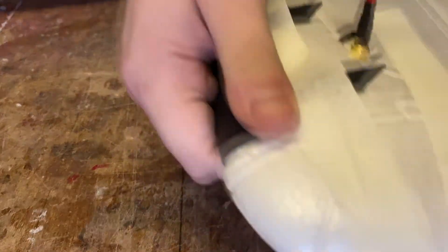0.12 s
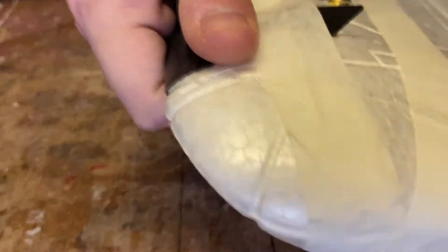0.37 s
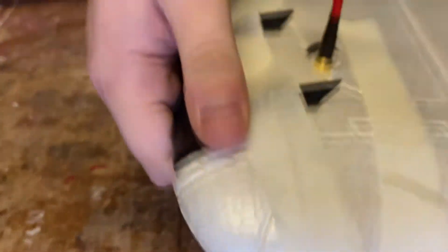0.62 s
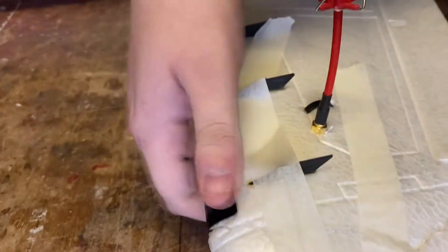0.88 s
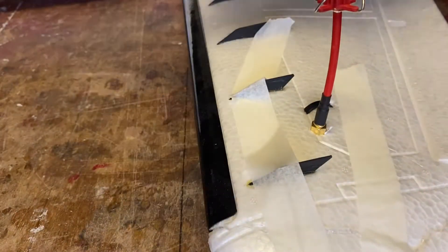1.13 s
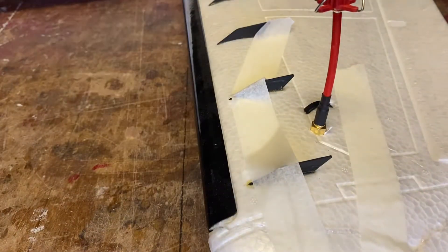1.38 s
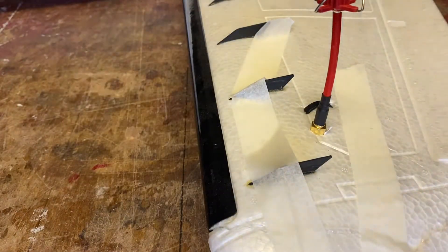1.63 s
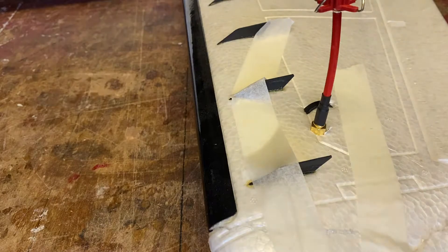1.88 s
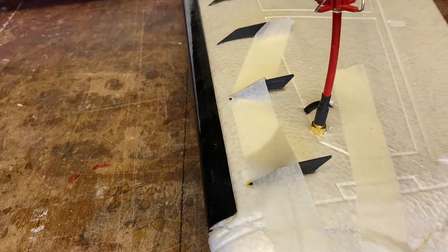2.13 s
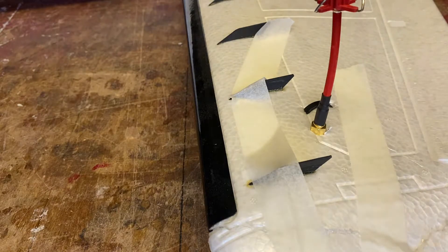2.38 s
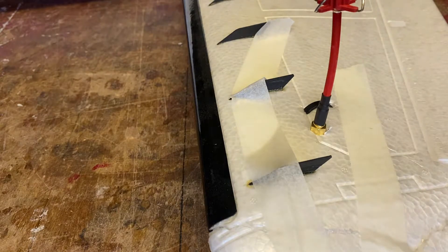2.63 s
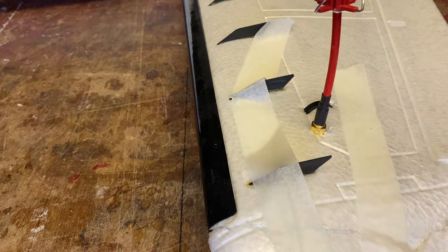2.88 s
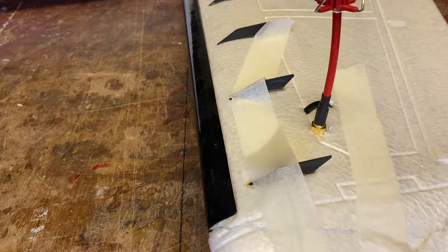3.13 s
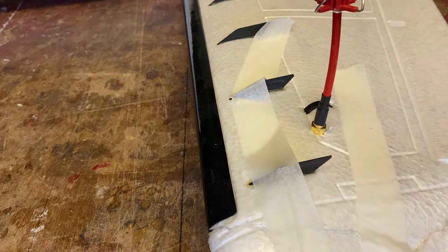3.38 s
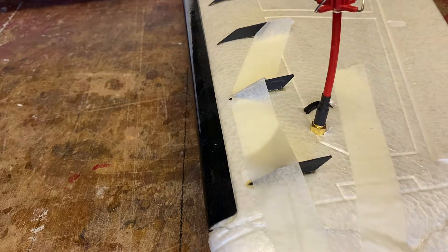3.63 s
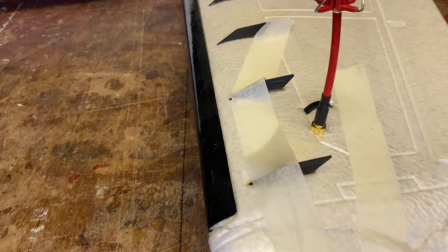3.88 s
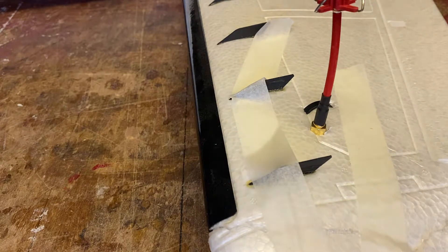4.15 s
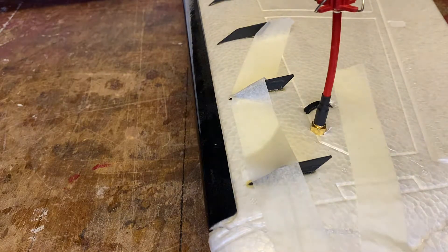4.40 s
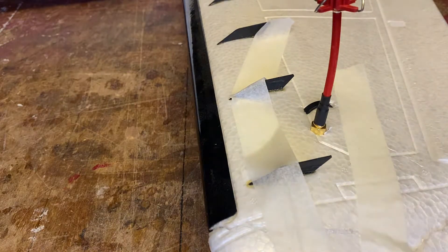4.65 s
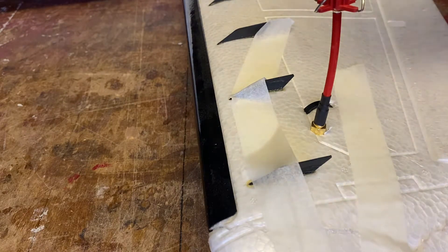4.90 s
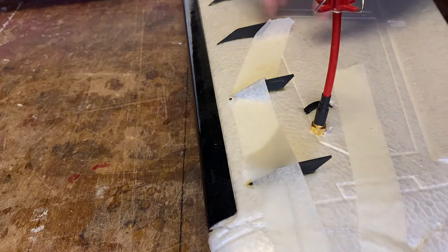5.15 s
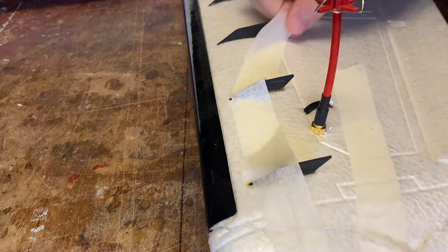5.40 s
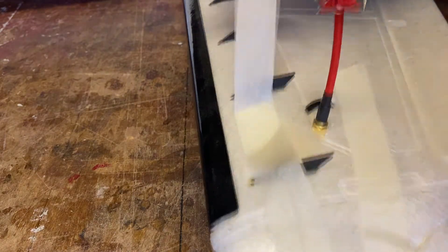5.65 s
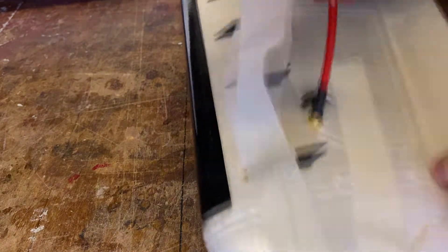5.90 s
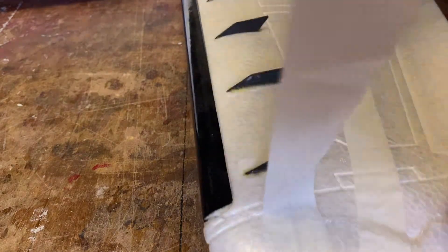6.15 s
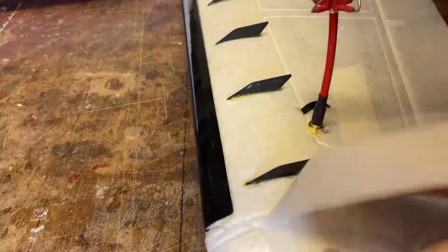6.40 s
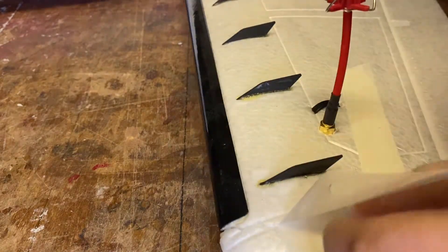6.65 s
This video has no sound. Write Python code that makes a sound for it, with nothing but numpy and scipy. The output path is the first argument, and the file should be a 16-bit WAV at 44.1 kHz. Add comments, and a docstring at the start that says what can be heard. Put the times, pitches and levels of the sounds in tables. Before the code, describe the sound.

Tape rips off a foam model wing: opening snaps and knocks, crisp crumpling of a loose strip, near silence, then sharp fast rips and bench knocks.

```python
"""A small quiet workshop: tape is peeled off a foam model wing in short rips, close to two microphone ports.
The peel is made of short noise bursts when slow and dense crackle when fast, with short ticks around it.
The wing slides on the bench as resonant noise and knocks as falling tones; low rumble thuds and once rises.
Between the peels a loose strip of tape crumples off to the right, as coloured bursts, rustle and low body.
A short room answer, a low hum and a faint hiss lie behind."""
import sys
import numpy as np
from scipy import signal
from scipy.fft import rfft, irfft, next_fast_len
from scipy.io import wavfile

SR = 44100
rng = np.random.default_rng(int(sys.argv[2]) if len(sys.argv) > 2 else 0)


def convert_level_to_amplitude(level_db):
    """Map a level in decibels to its linear amplitude factor."""
    exponent = np.asarray(level_db, float) / 20
    return 10 ** exponent


def waveform_to_disk(signal):
    """Save audio, clipped to [-1, 1], as 16-bit WAV at the path in sys.argv[1]."""
    frames = np.transpose(np.atleast_2d(signal))
    scaled = np.clip(frames, -1, 1) * 32767
    samples = np.round(scaled).astype(np.int16)
    wavfile.write(sys.argv[1], SR, samples)


N = 298557  # samples


# Fast rips of the tape. Each row: start in seconds, end in seconds, level in dB.
FAST_RIPS = [(5.721, 5.779, -22), (5.841, 5.882, -18.5)]
# Slow pulls on the tape. Each row: start in seconds, hold in seconds, level in dB.
SLOW_TUGS = [(0, .11, -30.5), (.645, 0.038, -37), (.8, .09, -36), (5.335, 0.075, -35), (5.43, 0.025, -33.5),
             (5.465, 0.045, -31), (5.512, 0.023, -22.5), (5.557, 0.03, -21.5), (5.605, 0.015, -27),
             (5.637, 0.0045, -27), (5.66, .05, -47.5), (5.778, .03, -37.5)]
# Tone colour of the peeling and of the short ticks. Each row: frequency in Hz, level in dB.
PEEL_COLOUR = [(150, -7.5), (500, 4.5), (2200, 6.5), (3700, 4), (6000, 4.5), (10000, 5.5), (15600, 0),
               (16500, -14.5)]


def peeling():
    """Glue threads break one by one when pulled slowly and merge into a rip when pulled fast."""
    tug = swells(SLOW_TUGS, rise=1999.5, fall=902.5)
    threads = scatter(tug, rate=400, spread_db=3.5, centre_hz=5500, octaves=2.5)
    slow = [snaps(threads, PEEL_COLOUR, rise=0.000093, life=0.00077, octaves=2.9, gain_db=2.5)
            for _ in range(2)]
    crackling = crackle(rate=5200, spread_db=0.0, life=0.00041, smooth=0.33)
    fast = unit(coloured(pair(crackling, alike=0.61), PEEL_COLOUR))
    t = np.arange(N) / SR
    pull = np.zeros(N)
    for start, end, db in FAST_RIPS:
        fade_in = np.clip((t - start) / 0.0077, 0, 1)
        fade_out = np.clip((end - t) / 0.0038, 0, 1)
        pull += convert_level_to_amplitude(db) * fade_in * fade_out
    slow_peel = tug * (pair(slow, alike=0.2) + convert_level_to_amplitude(-9) * fast)
    return slow_peel + pull * fast


# Short ticks: glue snaps during the peels, small ticks and taps of handling between them.
# Each row: time in seconds, relative level in dB, centre pitch in Hz.
SHORT_TICKS = [(0.0154, -10, 13820), (0.0273, -15, 14980), (0.0483, -2.5, 2120), (0.0907, -19, 2970),
               (0.1027, -3.5, 9530), (0.1164, -12.5, 2000), (0.4065, -20.5, 2670), (0.6311, -28, 5875),
               (0.6486, -23, 3360), (0.6711, -22.5, 4674), (0.7986, -20, 4047), (0.8064, -20.5, 3620),
               (0.8659, -16, 6860), (0.8844, -19, 3264), (1.1054, -35, 5964), (4.0243, -35.5, 4800),
               (4.0721, -30.5, 5595), (5.3063, -20.5, 2605), (5.3348, -21, 10020), (5.3438, -19, 10710),
               (5.3657, -18, 9840), (5.3702, -16.5, 11300), (5.376, -16, 9990), (5.4341, -13, 2540),
               (5.4515, -13, 15090), (5.5101, -9, 2090), (5.5443, -12.5, 10130), (5.5578, -11, 9730),
               (5.5874, -6.5, 9250), (5.6234, -12.5, 2427), (5.6361, -10.5, 9300), (5.7256, -17.5, 2440),
               (5.8386, -5.5, 10420), (6.2053, -27, 1830), (6.4029, -33.5, 2277), (6.4967, -37.5, 952),
               (6.5141, -31.5, 1149), (6.7251, -28.5, 1124)]


def ticks():
    """Each glue snap or small tap is a short noise burst leaning to its own pitch."""
    sides = [snaps(SHORT_TICKS, PEEL_COLOUR, rise=0.0003, life=0.0026, octaves=0.45, gain_db=-1.0)
             for _ in range(2)]
    return pair(sides, alike=0.43)


# The loose strip buckles. Each row: time in seconds, relative level in dB, centre pitch in Hz.
STRIP_CREASES = [(1.3592, -24, 1974), (1.4589, -29, 2953), (1.5178, -21, 4790), (1.638, -19.5, 2000),
                 (1.6634, -24.5, 2858), (1.6733, -15.5, 2758), (1.7386, -20, 2580), (1.823, -20, 5700),
                 (1.8432, -13.5, 5500), (1.9021, -24.5, 5380), (1.9985, -12, 5223), (2.009, -5, 2632),
                 (2.0842, -6.5, 4435), (2.1829, -24.5, 5780), (2.2505, -21.5, 5600), (2.2979, -24, 2980),
                 (2.3068, -20, 4500), (2.358, -23.5, 5914), (2.3787, -15.5, 5500), (2.4441, -24, 2700),
                 (2.5477, -9.5, 5240), (2.6291, -17.5, 3546), (2.6501, -21.5, 5660), (2.6892, -20, 5220),
                 (2.721, -17, 4620), (2.733, -16, 4660), (2.8646, -18, 3760), (2.8768, -28.5, 3240),
                 (2.9764, -23, 2594), (3.0094, -28, 5980), (3.027, -21, 2530), (3.1995, -28, 5800),
                 (3.227, -18.5, 2830), (3.2455, -24.5, 5310), (3.2564, -23, 3250), (3.339, -26, 6100),
                 (3.46, -31, 4330), (3.545, -32.5, 4525), (3.6344, -17.5, 5130), (3.7157, -33, 5900),
                 (3.796, -32, 1800)]
# The fist closes on the loose strip. Each row: start in seconds, hold in seconds, level in dB.
FIST_SQUEEZES = [(1.33, 0.13, -43), (1.515, 0.012, -31.5), (1.57, 0.17, -39.5), (1.81, 0.071, -30),
                 (1.985, 0.02, -31.5), (2.23, 0.05, -41.5), (2.36, 0.16, -42), (2.62, 0.095, -44),
                 (2.81, 0.021, -56), (2.9, 0.024, -50), (3.01, 0.026, -41), (3.145, 0.0097, -55),
                 (3.2, 0.13, -54), (3.4, 0.023, -46.5), (3.525, 0.1, -55)]
# Tone colour of the strip. Each row: frequency in Hz, level in dB.
STRIP_COLOUR = [(150, -36), (600, -20), (1200, -9.5), (2100, -6.5), (2800, -3.5), (3800, -6), (5500, -2.5),
                (8000, -9.5), (14000, -21.5), (16000, -25.5)]
# Tone colour of skin, on the strip and on the foam. Each row: frequency in Hz, level in dB.
SKIN_COLOUR = [(2000, -5.5), (5000, -6.5), (10000, -6.5), (16500, -14.5)]


def crumpling():
    """The stiff strip buckles in creases, each leaning to its own pitch, around two broad resonances."""
    settling = [(s, 0, db - 29.5) for s, db, _ in STRIP_CREASES]  # rustle after each crease
    grip = swells(FIST_SQUEEZES, rise=692.5, fall=318.5) + swells(settling, rise=6002.5, fall=399.5)
    folds = scatter(grip, rate=400, spread_db=4.0, centre_hz=4250, octaves=1.3)
    faces = []
    for _ in range(2):  # the two ports hear somewhat different faces of the strip
        rustle = snaps(folds, STRIP_COLOUR, rise=0.00028, life=0.0012, octaves=0.14, gain_db=3.5)
        fingers = convert_level_to_amplitude(-12) * unit(coloured(rng.standard_normal(N), SKIN_COLOUR))
        faces.append(grip * (rustle + fingers))
    creases = snaps(STRIP_CREASES, STRIP_COLOUR, rise=0.00015, life=0.0012, octaves=0.23, gain_db=1)
    far, near = pair(faces, alike=0.39) + creases

    def to_left(hz):
        """From the side, the bass reaches the left port weaker and turned over; everything comes late."""
        low = 1 / (1 + (hz / 900) ** 4)
        lag = 17 / SR  # seconds
        return convert_level_to_amplitude(-10.5 * low) * np.exp(-1.9j * low - 2j * np.pi * hz * lag)

    return np.array([filtered(far, to_left), near])


# The wing hits the bench. Each row: time in seconds, relative level in dB, pitch factor,
# and ring time in seconds (the decay to about a third).
BENCH_KNOCKS = [(0.015, -9.5, 1.39, 0.0015), (0.049, -6.5, 0.76, 0.0018), (0.103, -11.5, 1.26, 0.0017),
                (0.3016, -2.5, 1.11, 0.0015), (0.453, -33, 0.86, 0.0047), (0.765, -27, 1.21, 0.0054),
                (0.83, -11, 0.96, 0.0038), (1.64, -38.5, 1.08, 0.0026), (4.071, -44, 1.73, 0.0024),
                (4.187, -55.5, 1.25, 0.0077), (4.237, -59, 1.07, 0.005), (4.345, -45, 1.08, 0.003),
                (4.444, -53.5, 1.22, 0.0044), (5.164, -29.5, 1.3, 0.00081), (5.8945, 0.5, 0.98, 0.002),
                (5.988, -9.5, 1.05, 0.00085), (6.1643, -5.5, 1, 0.0021), (6.218, -13, 1, 0.00092)]


def knocks():
    """A bending wave in the foam: high pitches arrive first, so each knock glides down, then the body rattles."""
    tones, blows = np.zeros(N + SR), np.zeros(N + SR)
    t = np.arange(SR // 4) / SR
    for s, db, pitch, ring in BENCH_KNOCKS:
        # the pitch falls from 1630 to 380 Hz, times the pitch factor
        cycles = pitch * (380 * t + 1.25 * (1 - np.exp(-t / .001)))
        swell = (1 - np.exp(-t / .0009)) ** 2 * np.exp(-t / ring)
        # the stiff skin rings briefly
        shell = convert_level_to_amplitude(-4) * np.exp(-t / 0.00071) * np.sin(2 * np.pi * pitch * 1630 * t)
        start = round((s + 0.00097) * SR)
        tones[start:][:len(t)] += convert_level_to_amplitude(db + 9) * swell * (np.sin(2 * np.pi * cycles) + shell)
        blows[start:][:len(t)] += convert_level_to_amplitude(db - 6) * (1 - np.exp(-t / 0.0023)) * convert_level_to_amplitude(-60 * t / 0.096)
    noise = pair(rng.standard_normal((2, N)), alike=1.0)
    return tones[:N] + filtered(blows[:N] * noise, wing)


# Resonances of the wing. Each row: frequency in Hz, width in Hz, level in dB.
FOAM_RESONANCES = [(316, 330, 6.5), (600, 270, 9), (900, 280, 5.5), (2000, 1800, -18)]


def wing(hz):
    """Causal response of the foam body: resonances added with alternating sign."""
    total = 0
    for k, (centre, width, db) in enumerate(FOAM_RESONANCES):
        resonance = 1j * hz * width / (centre * centre - hz * hz + 1j * hz * width)
        total = total + (-1) ** k * convert_level_to_amplitude(db) * resonance
    return total


# Strokes of low body and scuff: the wing pushed along the bench, and once (at 1.3 s) the strip's crumpling.
# Each row: start in seconds, hold in seconds, body level in dB, and how far the scuff lies above it in dB.
BODY_STROKES = [(0, 0.13, -48.5, -4), (0.402, 0.14, -51, -7.5), (0.578, 0.08, -47.5, -1.5),
                (0.69, 0.18, -50.5, 6.5), (1.302, .2, -60.5, 8), (3.73, 0.22, -77.5, 10.5),
                (4.024, 0.493, -71.5, 5), (5.113, 0.023, -64.5, 0.5), (5.177, 0.13, -57.5, 0.5),
                (5.902, 0.16, -51.5, 0), (6.201, 0.08, -51, 0.5), (6.403, 0.03, -55.5, 4),
                (6.494, 0.025, -49.5, 1), (6.728, .05, -49.5, 0.5)]
# Tone colour of the scuff. Each row: frequency in Hz, level in dB.
SCUFF_COLOUR = [(350, -25), (490, -10.5), (750, -15), (1070, -6.5), (1350, -9.5), (2200, -11.5),
                (3300, -17), (8000, -28.5)]


def strokes():
    """Uneven rubbing noise passes through the foam's resonances as low body, with a brighter scuff on top."""
    rubbing = crackle(rate=60, spread_db=1.2, life=0.01, smooth=2.5)
    body = unit(filtered(pair(rubbing, alike=0.92), wing))
    scraping = crackle(rate=130, spread_db=3, life=0.005, smooth=1.8)
    scuff = unit(coloured(pair(scraping, alike=0.5), SCUFF_COLOUR))
    body_rows = [(s, hold, db) for s, hold, db, _ in BODY_STROKES]
    scuff_rows = [(s, hold, db + over) for s, hold, db, over in BODY_STROKES]
    body_gain = swells(body_rows, rise=1200.5, fall=187)
    scuff_gain = swells(scuff_rows, rise=1200.5, fall=187)
    return body_gain * body + scuff_gain * scuff


# Skin brushes over the foam. Each row: start in seconds, hold in seconds, level in dB.
SKIN_BRUSHES = [(0, .1, -45), (.22, 0.21, -46), (.5, 0.41, -57.5), (1.03, 0.18, -54.5), (1.3, 0.32, -45.5),
                (4.025, 0.093, -64.5), (4.15, 0.38, -67), (5.25, 0.081, -62.5), (6.2, 0.034, -60.5)]


def brushing():
    """Skin rubbing over foam gives a smooth hiss that swells and fades."""
    skin = unit(coloured(pair(rng.standard_normal((2, N)), alike=0.23), SKIN_COLOUR))
    return swells(SKIN_BRUSHES, rise=298.5, fall=176) * skin


# Low rumble: short thuds, and one long faint rise of the background (at 4.05 s).
# Each row: start in seconds, hold in seconds, level in dB.
LOW_RUMBLES = [(.045, 0.022, -25.5), (.42, 0.24, -60), (.78, 0.071, -34), (1.23, 0.12, -53.5),
               (4.05, 1.05, -72.5), (5.175, 0.029, -48), (5.55, .1, -42), (5.74, 0.067, -41.5),
               (5.88, 0.064, -38), (6.17, 0.05, -44), (6.425, 0.033, -50), (6.51, 0.033, -48.5),
               (6.64, 0.035, -57.5)]
# Tone colour of this rumble and of the background hum. Each row: frequency in Hz, level in dB.
RUMBLE_COLOUR = [(33, -30.5), (50, -3), (74, -4.5), (105, -10), (170, -9), (300, -14.5), (500, -45.5)]


def rumbling():
    """Uneven low noise rises and fades: brief and strong it thuds, long and faint it lifts the background."""
    shaking = crackle(rate=32, spread_db=1.5, life=0.012, smooth=1.5)
    rumble = unit(coloured(pair(shaking, alike=0.96), RUMBLE_COLOUR))
    return swells(LOW_RUMBLES, rise=698, fall=226.5) * rumble


# How long the workshop rings. Each row: frequency in Hz, time to fall by 60 dB in seconds.
ROOM_DECAY = [(200, 0.12), (1500, 0.19), (6000, 0.19), (14000, 0.071)]


def room(x):
    """Each frequency of the workshop's answer dies at its own speed, differently at each port."""
    hz, t, z = signal.stft(rng.standard_normal((2, SR // 3)), SR, nperseg=256)
    decay = convert_level_to_amplitude(-60 * t / along(ROOM_DECAY, hz)[:, None])
    tail = signal.istft(z * decay, SR, nperseg=256)[1]
    tail = tail / np.linalg.norm(tail[0])
    late = np.pad(x, (130, 0))[None]  # the answer starts 130 samples late
    return signal.fftconvolve(late, tail, axes=1)[:, :N]


def background_hum():
    """Steady low noise, much alike at both ports."""
    noise = pair(rng.standard_normal((2, N)), alike=0.86)
    return convert_level_to_amplitude(-74.5) * unit(coloured(noise, RUMBLE_COLOUR))


# Tone colour of the background hiss. Each row: frequency in Hz, level in dB.
HISS_COLOUR = [(100, -41.5), (300, -2), (800, -5.5), (2500, -1.5), (15000, -17)]


def background_hiss():
    """Steady faint noise, separate at each port."""
    return convert_level_to_amplitude(-71.5) * unit(coloured(rng.standard_normal((2, N)), HISS_COLOUR))


def crackle(rate, spread_db, life, smooth):
    """Noise in short bursts of uneven size (rate per second, life in s) over a smooth share; two channels."""
    fired = rng.random(N) < rate / SR
    sizes = fired * convert_level_to_amplitude(np.minimum(spread_db * rng.exponential(size=N), 24))
    bursts = signal.lfilter([1], [1, -np.exp(-1 / (life * SR))], sizes)
    return (unit(bursts) + smooth) * rng.standard_normal((2, N))


def snaps(rows, spectrum, rise, life, octaves, gain_db):
    """One noise burst per row, leaning to its own centre frequency; rise and life are in seconds."""
    out = np.zeros(N + 1024)
    t = np.arange(1024) / SR - .004
    hz = np.fft.rfftfreq(1024, 1 / SR)
    shape = np.exp(-np.abs(t) / np.where(t > 0, life, rise))
    colour = convert_level_to_amplitude(along(spectrum, hz))
    for (s, db, centre_hz), noise in zip(rows, rng.standard_normal((len(rows), 1024))):
        lean = 0.55 + np.exp(-.5 * (np.log2((hz + 1) / centre_hz) / octaves) ** 2)
        burst = irfft(rfft(noise * shape) * lean * colour)
        start = round(s * SR)
        out[start:start + 1024] += convert_level_to_amplitude(db + gain_db) * burst / np.abs(burst).max()
    return out[round(.003 * SR):][:N]  # the burst turns from rise to fade 1 ms after its row's time


def scatter(gain, rate, spread_db, centre_hz, octaves):
    """Random rows (s, dB, centre Hz) wherever the gain is above -72 dB: many small, a few large."""
    u = rng.random((round(600 * N / SR), 4))  # 600 candidates a second, thinned to the rate
    audible = gain[(u[:, 0] * N).astype(int)] > convert_level_to_amplitude(-72)
    u = u[(u[:, 3] < rate / 600) & audible]
    times = u[:, 0] * N / SR
    levels = -spread_db * np.log(u[:, 1] + 0.015)
    centres = centre_hz * 2 ** (octaves * (2 * u[:, 2] - 1))
    return list(zip(times, levels, centres))


def swells(rows, rise, fall):
    """Gain per sample: each (start s, hold s, dB) row rises to its start, holds, then fades, in dB a second."""
    t = np.arange(0, N / SR + .002, .001)
    gain = np.zeros(len(t))
    for s, hold, db in rows:
        before = np.maximum(s - t, 0)
        after = np.maximum(t - s - hold, 0)
        gain += convert_level_to_amplitude(db - rise * before - fall * after)
    return np.interp(np.arange(N) / SR, t, gain)


def pair(noise, alike):
    """Left and right from two noises, with a given likeness."""
    turn = np.arccos(np.clip(alike, -1, 1)) / 2
    return np.cos(turn) * noise[0] + np.sin(turn) * noise[1] * np.array([[1], [-1]])


def unit(x):
    """Scaled to rms 1."""
    return x / np.sqrt(np.mean(x ** 2) + 1e-20)


def along(points, hz):
    """Reads (Hz, value) points on a log frequency axis."""
    f, v = np.transpose(points)
    return np.interp(np.log(hz + 1), np.log(f + 1), v)


def filtered(x, response):
    """x passed through a complex response of frequency."""
    m = next_fast_len(N + SR // 2)
    return irfft(rfft(x, m) * response(np.fft.rfftfreq(m, 1 / SR)), m)[..., :N]


def coloured(x, spectrum):
    """x shaped by (Hz, dB) points."""
    return filtered(x, lambda hz: convert_level_to_amplitude(along(spectrum, hz)))


def scene():
    """All sources, the room's answer to tape, strip and knocks, and the background."""
    tape, strip, blows = peeling() + ticks(), crumpling(), knocks()
    handling = strokes() + brushing() + rumbling()
    answer = room(convert_level_to_amplitude(-15) * tape[0] + convert_level_to_amplitude(-9) * strip[1] + convert_level_to_amplitude(-14) * blows[0])
    return tape + strip + blows + handling + answer + background_hum() + background_hiss()


def top_cut(x):
    """Nothing passes above the cut-off."""
    return signal.sosfilt(signal.butter(12, 16790, fs=SR, output="sos"), x)


def record(dry):
    """From 8 to 15 kHz both channels carry nearly the same sound, the left a little late; peaks clip softly."""
    left, right = filtered(dry, lambda hz: 1 / (1 + (hz / 16300) ** 60))

    def share(hz):
        """How much of the left channel is taken from the right."""
        return .97 / (1 + (7800 / (hz + 1)) ** 16) / (1 + (hz / 14800) ** 30)

    lag = 12.8 / SR  # seconds
    own = filtered(left, lambda hz: np.sqrt(1 - share(hz) ** 2))
    copy = filtered(right, lambda hz: share(hz) * np.exp(-2j * np.pi * hz * lag))
    x = np.array([own + copy, right])
    mix = x / (1 + np.abs(x) ** 8) ** (1 / 8)
    return top_cut(mix)


dry = scene()
out = record(dry)
waveform_to_disk(out)
```